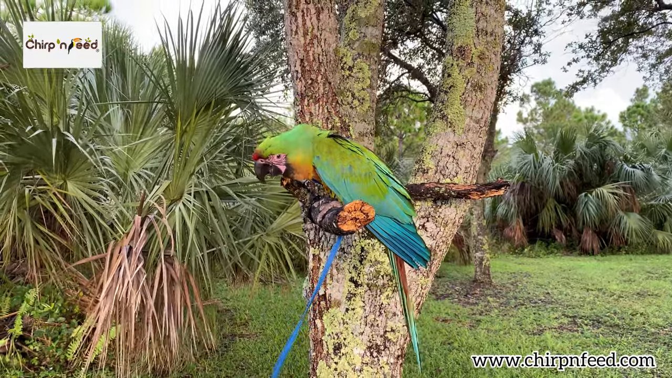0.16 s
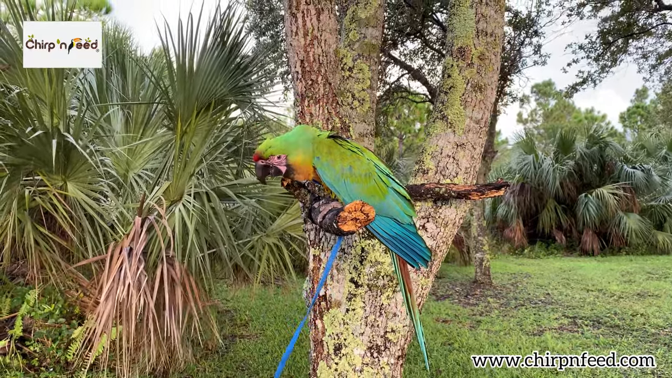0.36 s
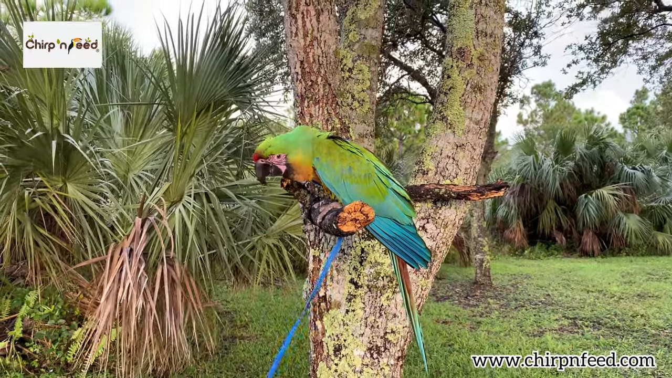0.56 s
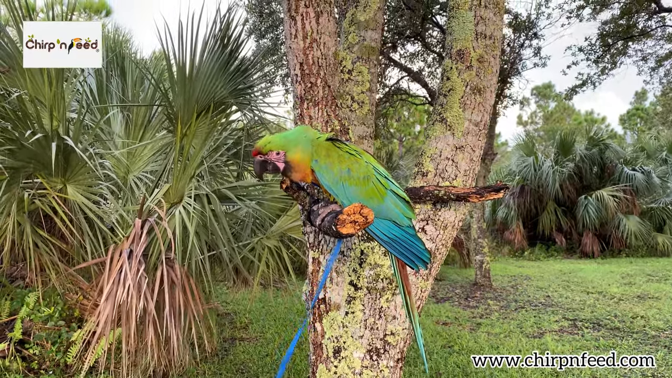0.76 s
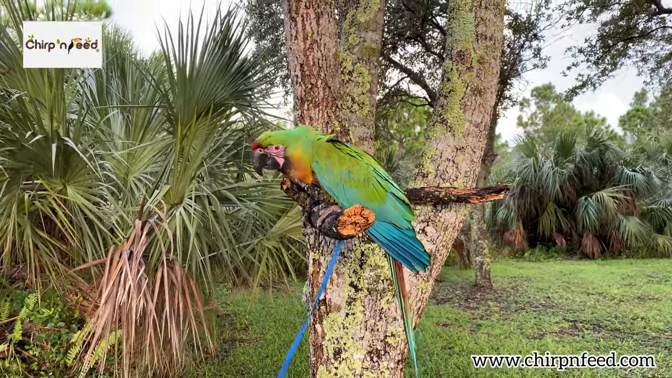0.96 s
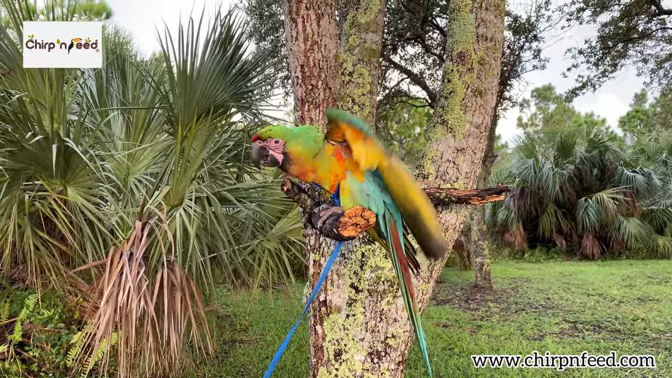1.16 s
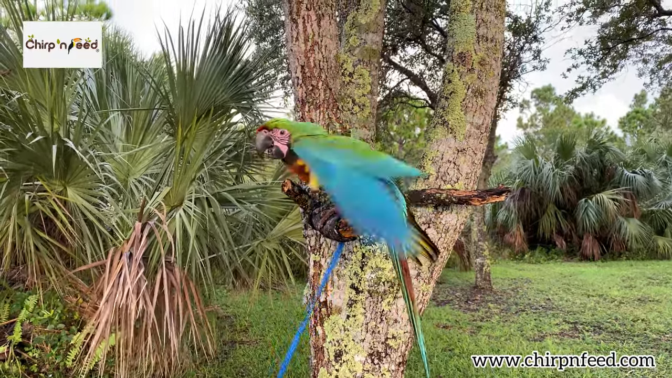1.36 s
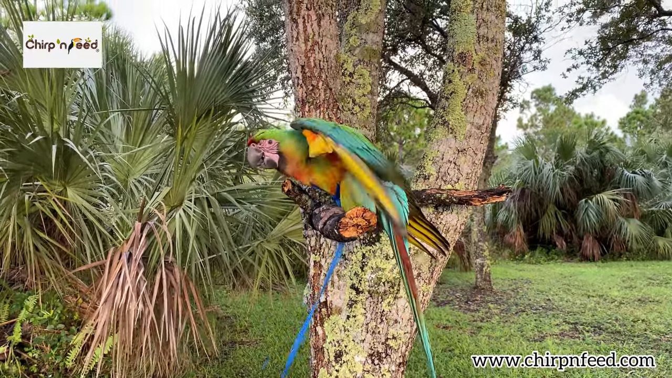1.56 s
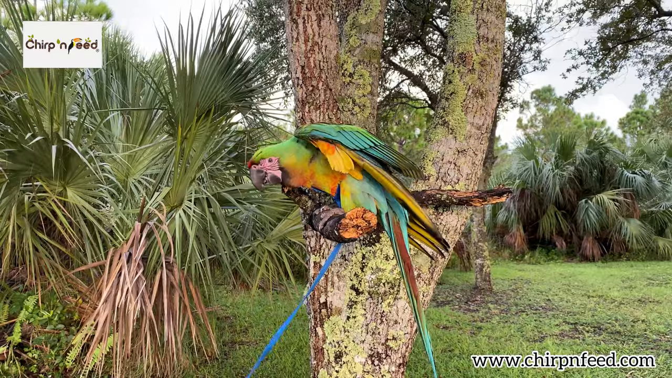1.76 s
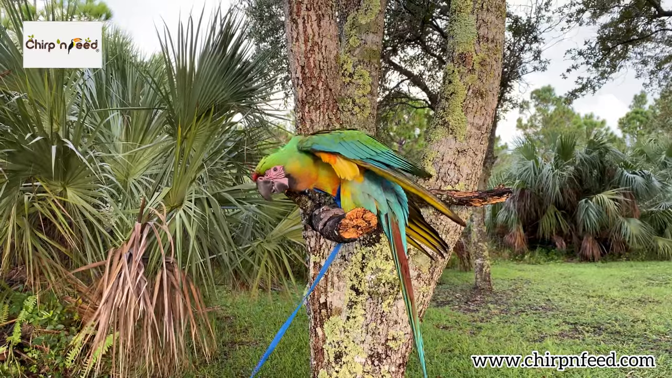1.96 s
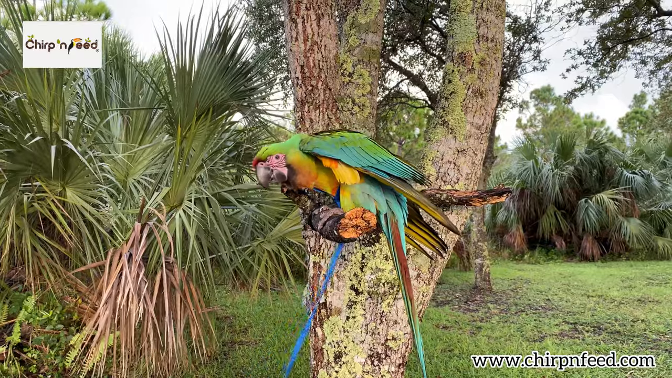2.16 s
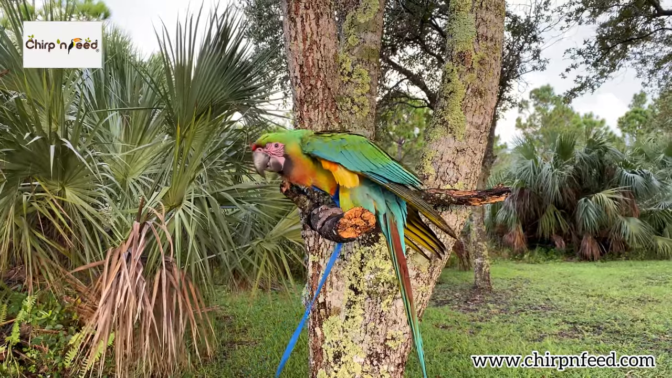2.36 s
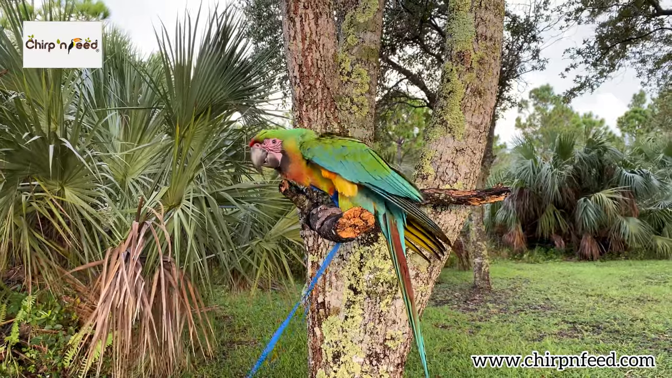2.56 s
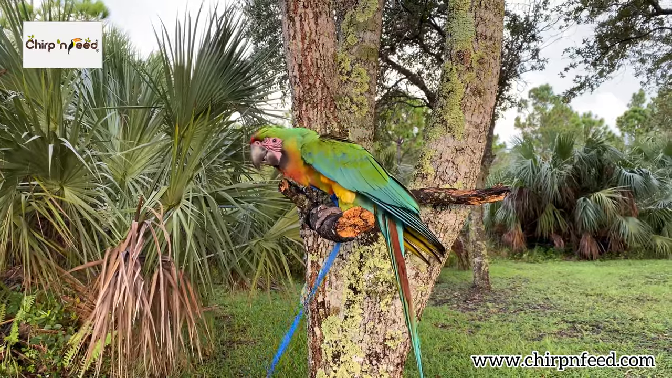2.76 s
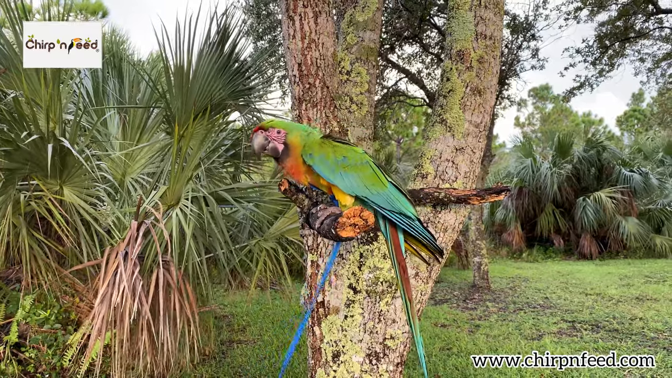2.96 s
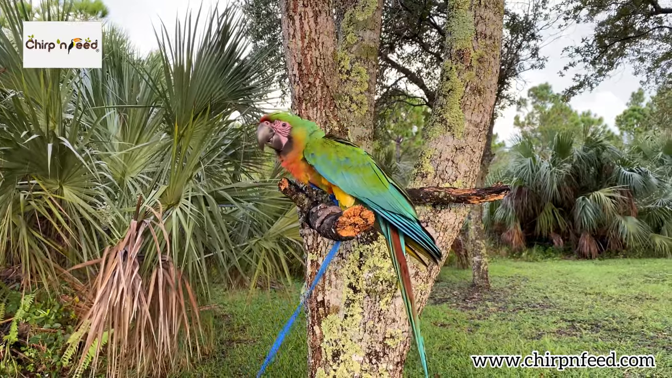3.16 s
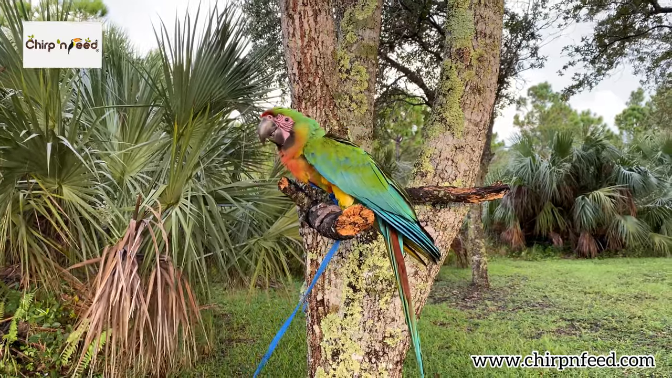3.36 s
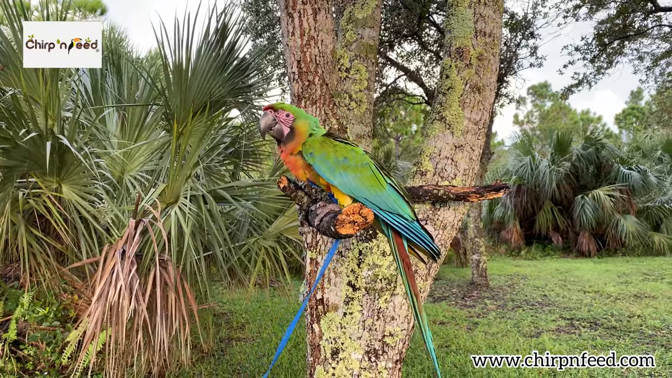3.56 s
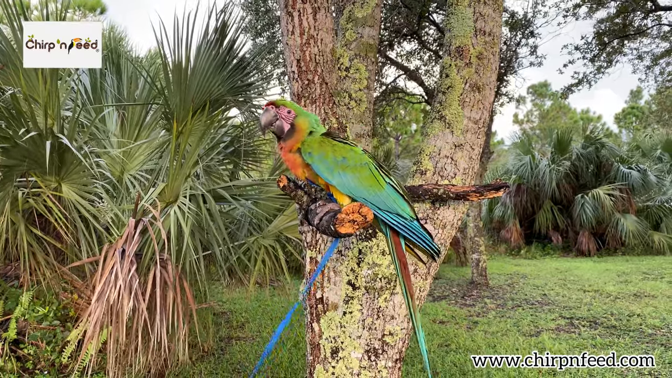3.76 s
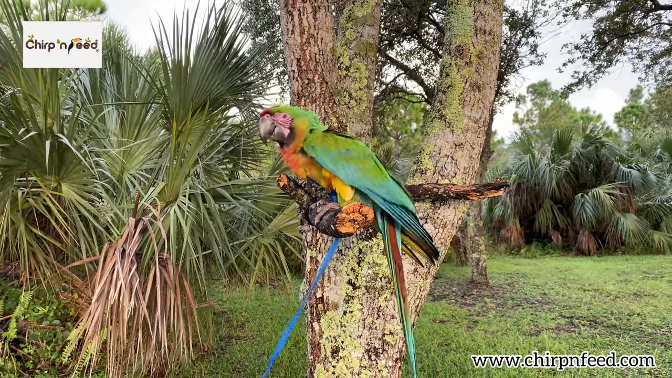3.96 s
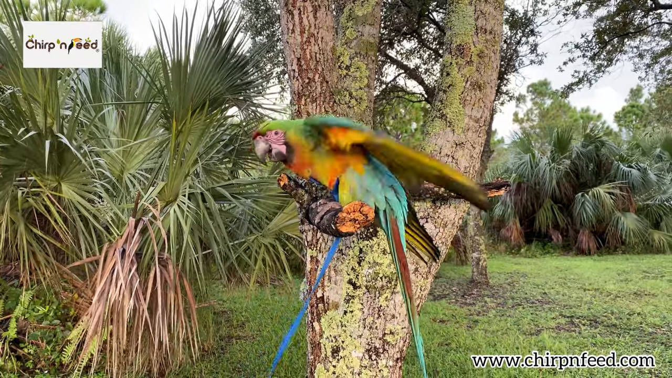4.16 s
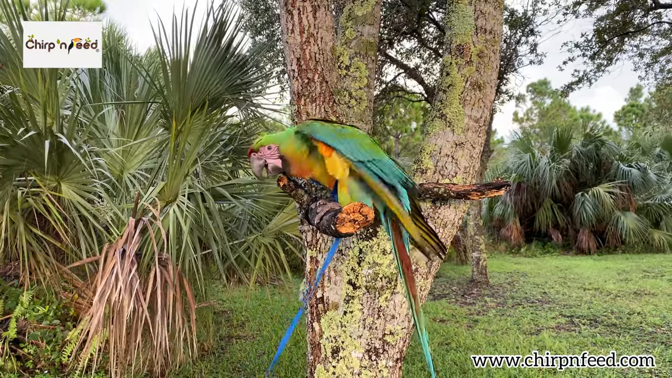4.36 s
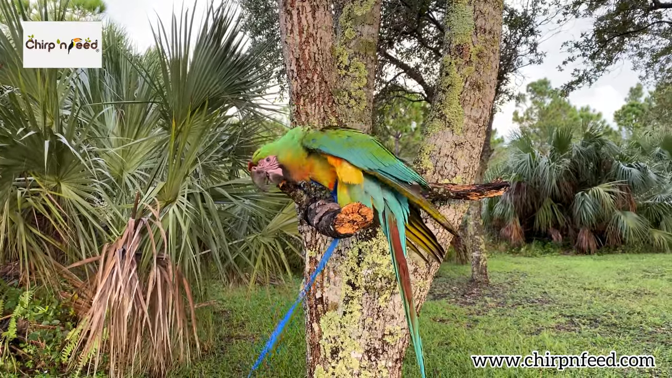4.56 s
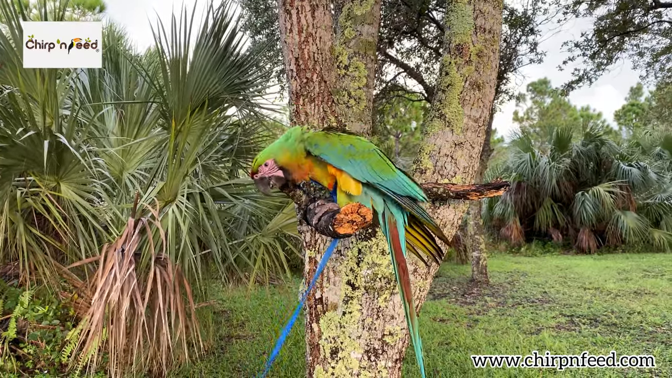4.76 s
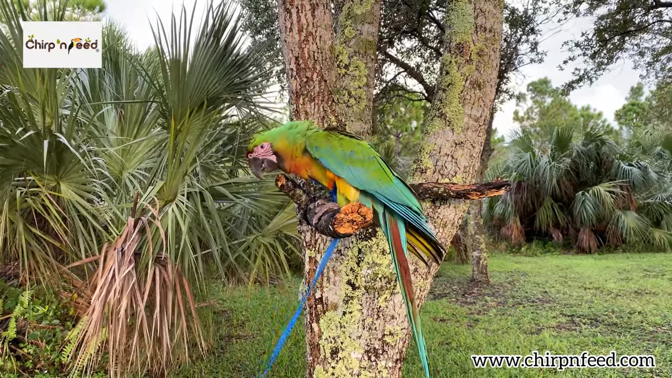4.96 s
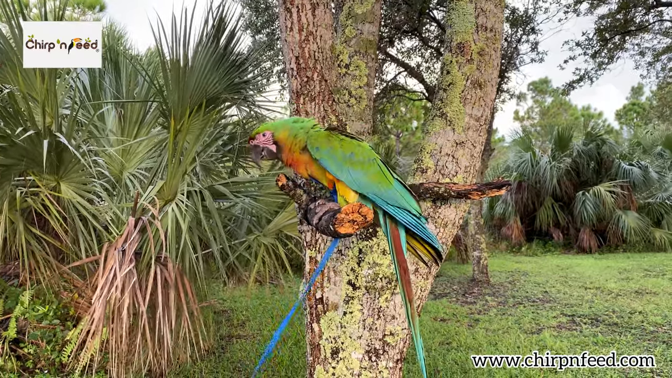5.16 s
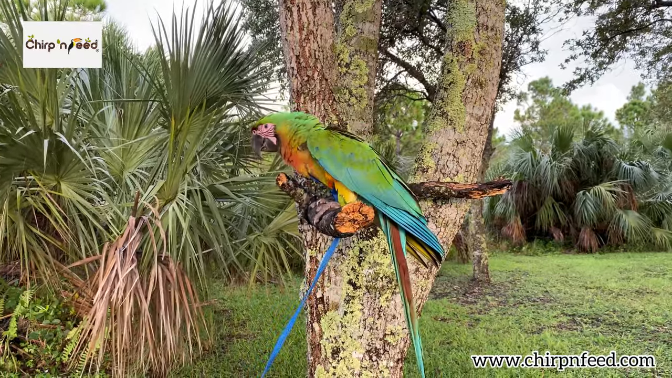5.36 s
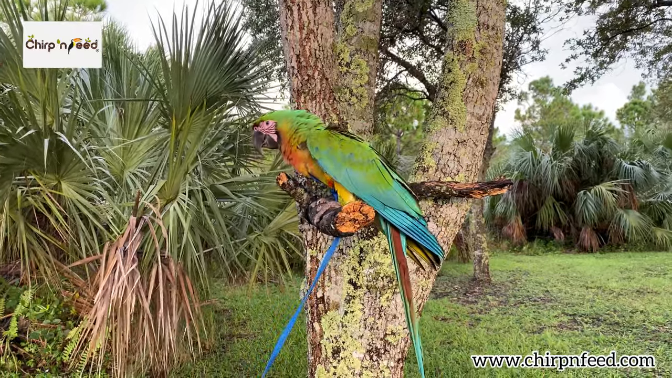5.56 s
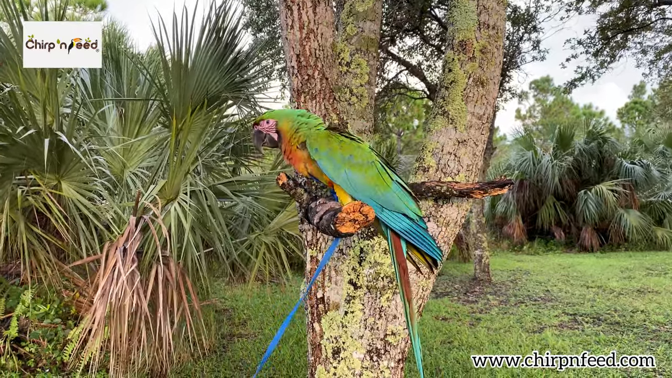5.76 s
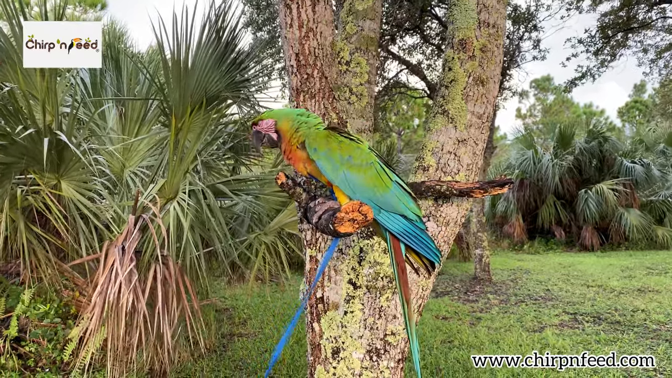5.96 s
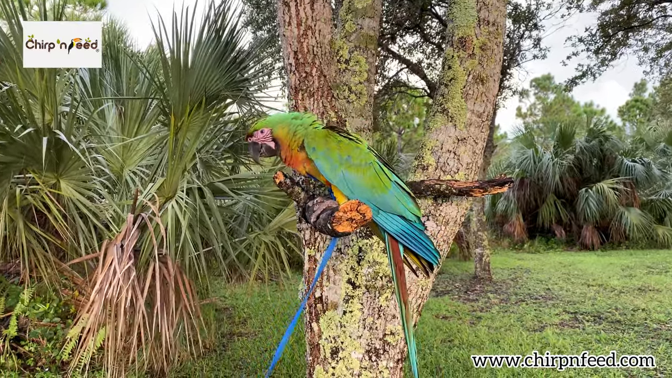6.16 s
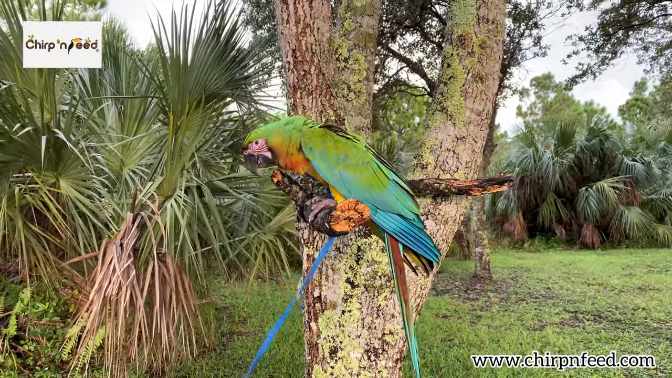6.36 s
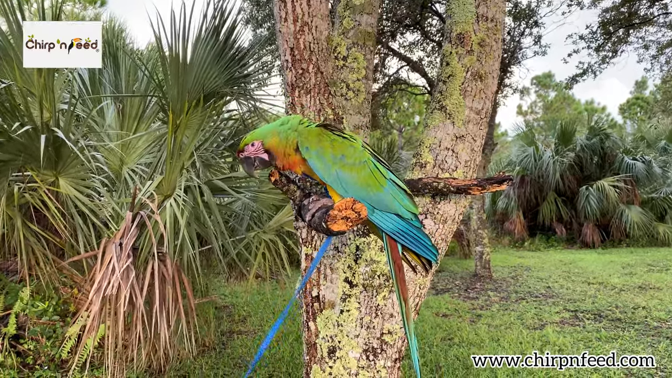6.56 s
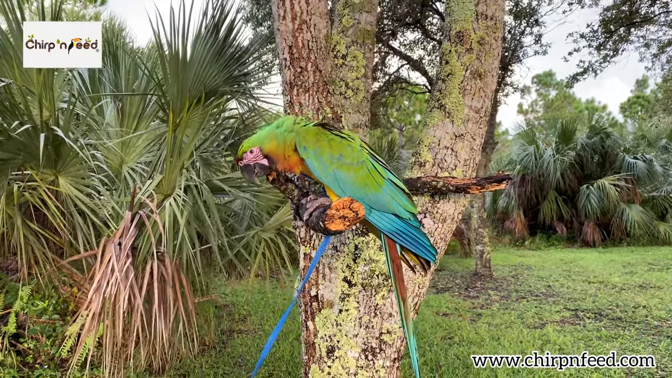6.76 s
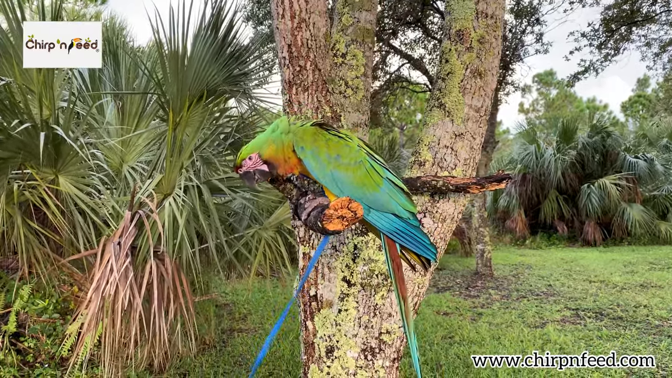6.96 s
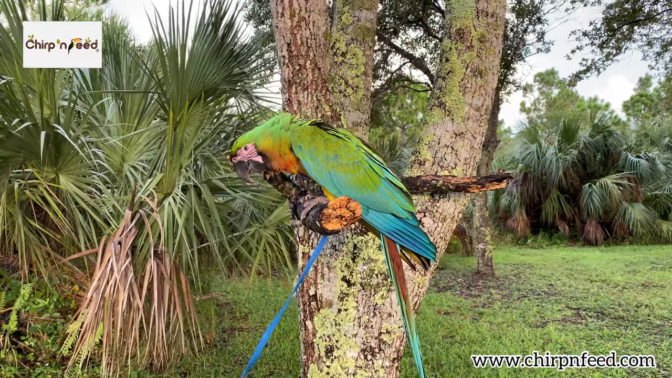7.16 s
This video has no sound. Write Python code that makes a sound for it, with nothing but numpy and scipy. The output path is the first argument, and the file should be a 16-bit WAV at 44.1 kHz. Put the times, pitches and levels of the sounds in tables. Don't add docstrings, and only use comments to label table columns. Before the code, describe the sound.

Outdoors, quiet low rumble and wind thumps; a big parrot squawks roughly near one second and again near four, feathers rustling softly.

```python
import sys
import numpy as np
from scipy import signal
from scipy.fft import rfft, irfft
from scipy.io import wavfile
from scipy.ndimage import uniform_filter1d

SR = 44100
rng = np.random.default_rng(int(sys.argv[2]) if len(sys.argv) > 2 else 0)


def store_pcm(level_fs):
    pcm = np.round(np.clip(level_fs, -1, 1) * 32767).astype(np.int16)
    wavfile.write(sys.argv[1], SR, np.atleast_2d(pcm).T)


def ratio_of_db(decibels):
    return 10 ** (np.asarray(decibels, float) / 20)


N = 317520

# time_s, level_db, throat_hz, brightness_db, roughness (0-1)
SQUAWKS = [
    [(1.194, -42.5, 925, 5, 0.48), (1.215, -36.5, 966, 0.5, 0.43), (1.258, -38.5, 926, 4, 0.37),
     (1.275, -43, 960, -0.5, 1.1), (1.308, -46, 970, 0, 0.9), (1.362, -41, 920, 0.5, 0.8),
     (1.382, -37, 1230, 3.5, 0.31), (1.415, -39.5, 1180, 0, 0.35), (1.447, -51.5, 1147, -6, 0)],
    [(4.1455, -38.5, 1430, -3, 0.2), (4.167, -37, 1405, 2.5, 0.15), (4.195, -36.5, 1240, 2.5, 0.25),
     (4.21, -38.5, 904, -0.5, 0.7), (4.24, -43, 990, -0.5, 0.85), (4.29, -43, 1030, -0.5, 0.8),
     (4.34, -41.5, 940, -1, 0.8), (4.362, -46, 920, 0, 0.5), (4.384, -60, 960, 0, 0.6)],
]
# time_s, peak_db
SLAPS = [(1.1988, -53), (1.2223, -29.5), (1.2318, -48), (1.259, -37), (1.2818, -50), (1.2926, -46),
         (1.3166, -45), (1.3297, -45), (1.3448, -39), (1.3561, -48), (1.3693, -32), (1.3856, -44),
         (1.4056, -42), (1.4126, -43), (4.2129, -32), (4.2336, -35), (4.2522, -43), (4.2628, -48),
         (4.2759, -36), (4.2863, -45), (4.2953, -43), (4.3102, -40), (4.334, -42), (4.3487, -39)]
# centre_hz, width_hz, first_call_db, second_call_db
HEAD = [(780, 200, -5, -5), (2330, 400, -6, -6), (2950, 380, -9, -9), (3560, 280, -6, -9),
        (4030, 340, -12, -8), (4680, 380, -8, -7.5), (5450, 500, -17, -17), (6300, 400, -20, -16),
        (7300, 400, -23, -29), (9000, 700, -30, -30), (10200, 1200, -32, -36), (12000, 1200, -36, -42),
        (14800, 1500, -44, -42)]


def rms_one(x):
    return x / np.sqrt(np.mean(x ** 2) + 1e-20)


def at_hz(points, hz, order=1):
    points = np.array(points)
    return np.interp(np.log(hz), np.log(points[:, 0]), points[:, order])


def bumps(rows):
    t = np.arange(N) / SR
    return sum(ratio_of_db(db) * np.exp(-((t - s) / width) ** 2) for s, width, db in rows)


def drift(rate):
    coarse = 40
    r = np.exp(-2 * np.pi * coarse * rate / SR)
    noise = rng.standard_normal(N // coarse + 2002)
    slow = signal.lfilter([1], [1, -2 * r, r * r], noise)[2000:]
    return np.interp(np.arange(N) / coarse, np.arange(len(slow)), rms_one(slow))


def resonance(x, hz, width_hz):
    hz = np.broadcast_to(hz, len(x))
    r = np.exp(-np.pi * width_hz / SR)
    step = 64 if np.ptp(hz) else len(x)
    zeros = [(1 - r * r) / 2, 0, (r * r - 1) / 2]
    out, state = np.zeros(len(x)), np.zeros(2)
    for i in range(0, len(x), step):
        poles = [1, -2 * r * np.cos(2 * np.pi * hz[i] / SR), r * r]
        out[i:i + step], state = signal.lfilter(zeros, poles, x[i:i + step], zi=state)
    return out


def banded_noise(spectrum, patchy_db, flicker_hz, alike=None):
    # band_hz, likeness (-1 to 1)
    likeness = [(60, 0.46), (110, 0.92), (200, 1), (380, 0.49), (700, -0.066), (1290, -0.73), (2380, 0.29),
                (4400, -0.28), (8120, 0.21), (15000, 0.096)]
    # band_hz, left_minus_right_db
    lean_points = [(60, 0.5), (110, 0.5), (200, 0.5), (380, 2.0), (700, -0.5), (1290, -2.5), (2380, -2.0),
                   (4400, 5.0), (8120, 1.5), (15000, 0.0)]
    lowest, highest = spectrum[0][0], spectrum[-1][0]
    edges = lowest * 2 ** np.arange(0, np.log2(highest / lowest) + 1 / 6, 1 / 3)
    together = drift(flicker_hz / 3)
    white = rng.standard_normal((2, 2, N))
    out = 0
    for k, (low, high) in enumerate(zip(edges, np.minimum(edges[1:], .45 * SR))):
        band = signal.butter(2, [low, high], "band", fs=SR, output="sos")
        mid, side = signal.sosfilt(band, white[k % 2])
        hz = np.sqrt(low * high)
        like = np.clip(at_hz(likeness, hz) if alike is None else alike, -.95, .95)
        gain = ratio_of_db(at_hz(spectrum, hz) + patchy_db * (.8 * together + drift(flicker_hz)))
        lean = ratio_of_db(at_hz(lean_points, hz) / 2 * np.array([[1], [-1]]))
        out = out + gain * lean * (np.sqrt(1 + like) * mid + np.sqrt(1 - like) * side * [[1], [-1]])
    return out / np.sqrt(np.mean(out.mean(axis=0) ** 2))


def wood_tail(x):
    t60_s = 0.27
    t = np.arange(SR // 2) / SR
    response = rng.standard_normal((2, len(t))) * ratio_of_db(-26.0 - 60 * t / t60_s)
    return signal.fftconvolve(x[None], response, axes=1)[:, :N]


def road():
    # band_hz, density_db (per Hz)
    drone = [(59, -34), (100, -12.5), (155, -6), (350, -6.5), (433, -7.5), (590, -14), (640, -17.5),
             (700, -29), (910, -45), (1540, -120)]
    # band_hz, density_db (per Hz)
    roar = [(330, -40.5), (560, -1), (590, -40.5), (639, -8.5), (896, -0.5), (1000, -3.5), (1360, -11),
            (1600, -16.5), (2080, -63.5), (3520, -120)]
    t = np.arange(N) / SR
    engines = ratio_of_db(-56.5) * banded_noise(drone, patchy_db=1.5, flicker_hz=13)
    tyres = ratio_of_db(-61.5 - 0.12 * t) * banded_noise(roar, patchy_db=1.2, flicker_hz=20.3)
    return engines + tyres


def machine():
    # band_hz, density_db (per Hz)
    whine = [(760, -41), (1300, -5), (1670, -2), (1980, 7), (2240, -8), (2400, -4), (2580, -7.5),
             (2860, -28), (3200, -12), (4160, -56), (7040, -120)]
    # time_s, width_s, level_db
    swells = [
        (0.1, 0.56, -83),
        (4.6, 0.52, -76.5),
        (5.96, 0.56, -69.5),
        (7.2, 0.55, -69),
    ]
    idle_db, on_db, start_s, rise_s = -74.5, -73, 4.2, 0.17
    running = np.clip((np.arange(N) / SR - start_s) / rise_s, 0, 1)
    gain = ratio_of_db(idle_db + (on_db - idle_db) * running) + bumps(swells)
    return gain * banded_noise(whine, patchy_db=1.04, flicker_hz=13)


def leaves():
    # band_hz, density_db (per Hz)
    rustle = [(1590, -36.5), (2700, -3), (3860, -5), (4590, -6), (5720, -14), (7140, -11.5), (9250, -35),
              (11200, -7.5), (12000, -27), (12700, -24), (16500, -46), (22000, -120)]
    start_db, steady_db, settle_s = -75.5, -81, 1
    lull_s, lull_width_s, lull_db = 3.53, 0.9, -3
    t = np.arange(N) / SR
    rustle_db = steady_db + (start_db - steady_db) * np.exp(-t / settle_s)
    rustle_db = rustle_db + lull_db * np.exp(-((t - lull_s) / lull_width_s) ** 2)
    out = ratio_of_db(rustle_db) * banded_noise(rustle, patchy_db=-0.5, flicker_hz=6.1)
    return signal.sosfilt(signal.butter(8, 12600, fs=SR, output="sos"), out)


def wind():
    # time_s, level_db
    breeze = [(0, -50.5), (.66, -56), (1.1, -54.5), (1.4, -52.5), (1.85, -52.5), (2.9, -49.5),
              (3.12, -52.5), (3.3, -42), (3.72, -45), (3.77, -55.5), (4.85, -51), (5.0, -61.5),
              (5.5, -52.5), (5.75, -54), (6.3, -44), (6.75, -51), (7.2, -47)]
    # time_s, level_db
    gusts = [(0.819, -40), (0.898, -47.5), (0.77, -42.5), (1.35, -44), (1.5, -62), (1.561, -58),
             (2.166, -47.5), (2.951, -47), (4.889, -43.5), (6.26, -59), (6.34, -67), (6.609, -50),
             (6.992, -49.5)]
    # band_hz, density_db (per Hz)
    buffet = [(12, -40.5), (20, -9), (51, 1.5), (75, -1.5), (145, -6.5), (211, -14.5), (372, -28),
              (431, -24.5), (500, -27.5), (650, -61), (1100, -120)]
    gust_width_s = 0.012
    breeze_s, breeze_db = np.transpose(breeze)
    air = ratio_of_db(np.interp(np.arange(N) / SR, breeze_s, breeze_db))
    air = air + bumps([(s, gust_width_s, db) for s, db in gusts])
    return air * banded_noise(buffet, patchy_db=.7, flicker_hz=14, alike=.35)


def thumps():
    # time_s, peak_db, push_hz
    pushes = [(0.763, -37, 178), (.78, -48, 110), (0.824, -35, 143), (0.893, -37, 151), (1.012, -39.5, 186),
              (1.505, -37.5, 80), (1.568, -41.5, 99), (5.8, -42, 149), (2.959, -49, 110),
              (3.28, -36.5, 102), (3.334, -31.5, 110), (3.462, -36, 90), (3.492, -34, 81),
              (3.543, -32, 130), (3.681, -34.5, 90), (3.714, -36, 85), (4.251, -37, 120),
              (6.262, -38.5, 90), (6.336, -37, 85), (6.554, -41, 90), (6.604, -35, 85), (6.657, -38.5, 80),
              (6.877, -38.5, 90), (6.995, -33, 74)]
    t, out = np.arange(N) / SR, 0
    for (s, db, hz), lean_db in zip(pushes, rng.normal(0, 1.4, len(pushes))):
        u = np.clip((t - s) * hz * 4, -9, 9)
        out = out - ratio_of_db(db + 4 + lean_db * np.array([[1], [-1]])) * u * np.exp(-u ** 2 / 2)
    return out


def trills():
    # start_s, length_s, singer (row of singers; 4 the machine, 5 the road), level_db
    calls = [(0, .97, 3, -87.5), (.79, .11, 3, -83), (0, .14, 3, -86), (.53, .25, 2, -86),
             (.327, .1, 2, -77.5), (1.99, .3, 2, -86), (2.663, .13, 0, -80.5), (3.66, .11, 0, -84),
             (4.64, .089, 0, -85), (5.479, .18, 0, -83.5), (5.797, .32, 2, -84), (6.136, .14, 0, -86),
             (6.522, .16, 1, -82), (6.7, .2, 0, -84.5), (4.35, 2.83, 4, -72.5), (1.897, 1.1, 5, -61.5),
             (5.18, .17, 6, -79)]
    # centre_hz, width_hz,
    # throbs_per_s
    singers = [(7250, 830, 29), (4800, 710, 24), (4560, 690, 22), (7150, 230, 98), (2243, 160, 14),
               (1056, 190, 11), (2870, 210, 7.5)]
    out = np.zeros((2, N))
    for s, length, singer, db in calls:
        hz, width_hz, throbs = singers[singer]
        t = np.arange(int(length * SR)) / SR
        throb = (.3 + np.exp(-3.0 * (t * throbs % 1))) * np.sin(np.pi * t / length) ** .4
        noise = rng.standard_normal((2, len(t))) * throb
        buzz = [resonance(resonance(w, hz, width_hz), hz, width_hz) for w in noise]
        out[:, round(s * SR):][:, :len(t)] += ratio_of_db(db) * rms_one(np.array(buzz))
    return out


def birds():
    # start_s, length_s, from_hz, to_hz, level_db
    early = [(0.16, .04, 4330, 4300, -80), (1.035, 0.023, 4200, 3900, -80), (1.992, 0.043, 5000, 4500, -80),
             (2.54, .016, 4200, 4500, -72), (2.545, .027, 5160, 5000, -78), (2.561, 0.038, 4600, 3470, -70),
             (2.601, .04, 3650, 3450, -78), (2.8, .035, 4550, 4420, -82), (2.809, .04, 5030, 4900, -86),
             (3.33, 0.014, 2840, 3100, -74), (3.345, .03, 3050, 2950, -82), (3.906, 0.028, 4700, 4500, -80),
             (3.94, .07, 3770, 3790, -86), (4.594, 0.028, 4600, 3970, -79), (4.684, .105, 3810, 3700, -78),
             (4.79, .05, 3750, 3800, -85), (5.362, 0.02, 5140, 4380, -70),
             (5.378, 0.064, 4380, 4210, -72.5), (5.774, .017, 4420, 3920, -76),
             (5.948, 0.047, 2250, 1930, -67), (6.29, .05, 2760, 2740, -79), (6.448, 0.12, 3750, 3710, -82),
             (6.45, .014, 3250, 3000, -74), (6.47, 0.016, 3250, 2890, -67)]
    # start_s, length_s, from_hz, to_hz, level_db
    slurs = [
        (0.797, 0.038, 3940, 2930, -78),
        (0.885, 0.062, 4130, 3000, -80),
        (2.735, 0.084, 3130, 5000, -76),
    ]
    # start_s, top_hz, then level_db of each note
    wren = [
        (3.376, 5430, -89, -79, -77, -96),
        (6.52, 5340, -76.5, -72, -73, -86),
    ]
    period_s, note_s, arch_hz, peak_at = .0445, .026, 420, .45
    notes = [(row, lambda u: 1 - (1 - u) ** 1.65) for row in early]
    notes += [(row, lambda u: u ** 1.6) for row in slurs]
    for s, top, *levels_db in wren:
        for k, db in enumerate(levels_db):
            row = (s + k * period_s, note_s, top, top - arch_hz, db - 2)
            notes.append((row, lambda u: (u / peak_at - 1) ** 2))
    out = np.zeros(N)
    flutter = rms_one(uniform_filter1d(rng.standard_normal(SR // 4), size=90))
    for k, ((s, length, hz0, hz1, db), shape) in enumerate(notes):
        u = np.linspace(0, 1, int(length * SR))
        phase = 2 * np.pi * np.cumsum(hz0 + (hz1 - hz0) * shape(u)) / SR
        gain = ratio_of_db(db + 3 + 1.5 * np.roll(flutter, 400 * k)[:len(u)])
        out[round(s * SR):][:len(u)] += gain * np.sin(np.pi * u) ** .6 * np.sin(phase)
    sides = np.array([ratio_of_db(7.0) * out, -ratio_of_db(-5.0) * np.roll(out, 3)])
    return sides + wood_tail(out)


def ticks():
    # time_s, peak_db, ring_hz
    taps = [(.023, -62, 4030), (0.16, -50, 2110), (0.162, -51, 2720), (.162, -52, 4230),
            (2.504, -68, 11100), (5.626, -74, 11600), (4.108, -64, 4300), (4.108, -66, 7050),
            (4.6, -73, 4700), (.9194, -74, 8700), (1.4664, -54, 9100), (1.486, -48, 6640),
            (1.5644, -54, 12100), (1.571, -66, 5740), (1.6044, -64, 6200), (1.6194, -72, 6000),
            (1.7194, -77, 7900), (2.504, -67, 7400), (2.505, -82, 4470), (2.909, -67, 11600),
            (3.6994, -75, 4380), (5.3514, -61, 4500), (5.36, -61, 3460), (6.1114, -66, 11500),
            (6.4656, -62, 3900), (6.8674, -72, 8750), (1.4945, -56, 5900), (1.4955, -46, 10500),
            (1.498, -54, 14500), (1.487, -48, 10400), (1.474, -64, 6500), (1.614, -68, 7550),
            (2.505, -71, 3600)]
    out, t = np.zeros((2, N + 900)), np.arange(900) / SR
    for s, db, hz in taps:
        width_hz, fade = hz ** 2 / 22000, 14 / hz
        noise = rng.standard_normal((2, 900)) * t * np.exp(-2 * t / fade)
        rings = [resonance(resonance(w, hz, width_hz), hz, width_hz) for w in noise]
        out[:, round((s - fade / 2) * SR):][:, :900] += ratio_of_db(db - 11.5) * rms_one(np.array(rings))
    out = out[:, :N]
    return out + ratio_of_db(-7.5) * wood_tail(out[0])


def feathers():
    # start_s, length_s, level_db
    rubs = [(0, .12, -93), (0.488, .09, -76), (0.576, 0.087, -80), (1.083, .03, -80), (1.146, 0.048, -63),
            (1.19, 0.24, -62.5), (1.41, .06, -70), (1.452, 0.091, -63), (1.464, 0.031, -65),
            (1.56, 0.074, -71), (1.628, .04, -89), (1.698, 0.089, -79), (4.075, 0.089, -69),
            (4.096, 0.038, -73), (4.144, 0.27, -72)]
    # band_hz, density_db (per Hz)
    plumage = [(1470, -26), (2500, 3), (3110, -1), (4110, -3), (6550, 0.5), (9080, -31), (11600, 26.5),
               (13400, 5), (14800, -7), (16000, -12)]
    t = np.arange(N) / SR
    swell = 0
    for s, length, db in rubs:
        swell = swell + ratio_of_db(db) * np.sin(np.pi * np.clip((t - s) / length, 0, 1)) ** 0.41
    return swell * banded_noise(plumage, patchy_db=2.0, flicker_hz=80, alike=-.1)


def hollowed(x, call):
    # centre_hz, width_hz, first_call_depth (0-1), second_call_depth (0-1)
    hollows = [(3340, 130, 0.045, 0.95), (4380, 130, 0.12, 0.31), (6540, 270, 1, 0.32)]
    for hz, width_hz, *depths in hollows:
        x = x - np.clip(depths[call], 0, 1) * resonance(x, hz, width_hz)
    return x


def slaps():
    cracks, fade = np.full(N, 1e-18), np.exp(-np.arange(200) / 32)
    for s, db in SLAPS:
        cracks[round((s + .001) * SR):][:200] = ratio_of_db(db + 19.5) * rng.standard_normal(200) * fade
    calls = []
    for call in range(2):
        rung = sum(ratio_of_db(1.25 * row[2 + call]) * resonance(cracks, row[0], 2 * row[1]) for row in HEAD[3:])
        calls.append(hollowed(rung, call))
    return np.where(np.arange(N) < SQUAWKS[1][0][0] * SR, calls[0], calls[1])


def flap_phase(start, size, wander):
    s = np.array(SLAPS)[:, 0]
    s = np.r_[0, s, s[-1] + 1]
    cycles = np.r_[0, np.cumsum(np.maximum(1, np.round(np.diff(s) * 190)))]
    even = np.interp((start + np.arange(size)) / SR, s, cycles)
    return np.maximum.accumulate(even + .13 * wander)


def gesture(rows, register):
    held_hz, switch_s = 324, .006
    attack_s, release_s = 0.0047, 0.0086
    throb_db, throb_bright_db, throb_width_s = 6, 3.5, .005
    catch_s, catch_width_s, catch_db = 1.308, .004, -7
    start, size = int(rows[0][0] * SR), int((rows[-1][0] - rows[0][0]) * SR)
    t = (start + np.arange(size)) / SR
    times, *columns = np.array(rows).T
    db, throat, bright_db, rough = [np.interp(t, times, c) for c in columns]
    open_hz, open_s, close_hz, close_s = register
    held = np.clip((t - t[0] - open_s) / switch_s + .5, 0, 1)
    slack = np.clip((t - t[-1] + close_s) / switch_s + .5, 0, 1)
    rate = open_hz + (held_hz - open_hz) * held + (close_hz - held_hz) * slack
    flap = np.clip(rough, 0, 1) * held
    jitter = .003 + .03 * flap
    weak_db = np.minimum(1.5 + 11 * flap, 8) * held * (1 - .5 * slack)
    edges = np.clip(np.minimum((t - t[0]) / attack_s, (t[-1] - t) / release_s), 0, 1)
    throb = flap * (sum(np.exp(-((t - s) / throb_width_s) ** 2) for s, _ in SLAPS) - .5)
    bright_db = bright_db + throb_bright_db * throb
    caught_db = catch_db * np.exp(-((t - catch_s) / catch_width_s) ** 2)
    gain = edges * ratio_of_db(db + throb_db * throb + caught_db)
    return start, size, gain, throat, bright_db, rate, jitter, weak_db, flap


def membrane(start, size, rate, jitter, weak_db, flap):
    wobble = rms_one(uniform_filter1d(rng.standard_normal((2, size)), size=120))
    cycle = np.floor(np.cumsum(rate * (1 + jitter * wobble[0])) / SR + .97)
    flap_cycle = flap_phase(start, size, wobble[1])
    choke = 1 - flap * (1 - np.exp(-5 * (flap_cycle % 1)))
    beats_db = -weak_db * (cycle % 2) + 40 * jitter * rng.standard_normal(size)
    beats = np.diff(cycle, prepend=0) * ratio_of_db(beats_db)
    flap_count = np.floor(flap_cycle)
    flaps = np.diff(flap_count, prepend=flap_count[0]) * flap * ratio_of_db(3 * rng.standard_normal(size))
    air = ratio_of_db(-42 + 10 * flap) * rng.standard_normal(size) * choke
    pulses = beats * choke * (1 - .7 * flap)
    return signal.lfilter([1], [1, -.6], pulses + flaps + air)


def squawk(rows, register, call):
    start, size, gain, throat, bright_db, rate, jitter, weak_db, flap = gesture(rows, register)
    source = membrane(start, size, rate, jitter, weak_db, flap)
    beak, beak_db = 1.865 * throat, -1.5 + 1.9 * bright_db
    low = resonance(source, throat, 208) - ratio_of_db(beak_db) * resonance(source, beak, 175)
    low = low + ratio_of_db(-7.0) * resonance(source, 1350, 210)
    low = signal.sosfilt(signal.butter(2, [480, 2800], "band", fs=SR, output="sos"), low)
    high = 0
    for k, (hz, width_hz, *levels_db) in enumerate(HEAD):
        ring = resonance(resonance(source, hz, width_hz), hz, 2 * width_hz)
        high = high + ratio_of_db(levels_db[call]) * (-1) ** (k + 1) * ring
    high = signal.sosfilt(signal.butter(2, 7800, fs=SR, output="sos"), high)
    chest = resonance(resonance(source, 323, 93), 323, 2 * 93)
    voice = hollowed(low + ratio_of_db(bright_db) * high, call)
    voice = voice + ratio_of_db(-9) * (1 - flap) ** 2 * chest + ratio_of_db(-19.5) * resonance(source, 525, 240)
    voice = voice / np.sqrt(uniform_filter1d(voice ** 2, size=900) + 1e-12)
    voice = 2.6 * np.tanh(voice / 2.6)
    return np.pad(gain * voice, (start, N - start - size))


def ports(x):
    # band_hz, left_lead_rad, left_minus_right_db
    pair = [(100, .05, 1.2), (700, .35, -.5), (1300, .75, -3), (2300, 1.7, -4.5), (3270, 2.35, -1.5),
            (3700, 2.1, 2), (4740, 2.0, 3.5), (6600, 2.3, 1), (8100, 2.3, -2.5), (10700, .6, -1),
            (15000, 2.0, -.5)]
    hz = np.fft.rfftfreq(N, 1 / SR) + 1
    half = ratio_of_db(at_hz(pair, hz, order=2) / 2) * np.exp(.5j * at_hz(pair, hz))
    return irfft(rfft(x) * [half, 1 / half], N)


def garden(x):
    # delay_s, level_db
    echoes = [(.0041, -23), (.0093, -24), (.017, -24), (.029, -28), (.046, -32), (.071, -36)]
    t = np.arange(4400) / SR
    smear = 0
    for lag, db in echoes:
        decay = np.exp(-np.abs(t - lag) / (0.39 * lag))
        smear = smear + ratio_of_db(db) * (t > lag) * decay / np.sqrt(lag * SR / 8)
    response = signal.lfilter([.6], [1, -.4], rng.standard_normal((2, len(t))) * smear)
    return signal.fftconvolve(x[None], response, axes=1)[:, :N]


def parrot():
    # opening_hz, opening_s, closing_hz, closing_s
    registers = [
        (200, .021, 275, .028),
        (291, .025, 322, .02),
    ]
    voice = sum(squawk(*call) for call in zip(SQUAWKS, registers, range(2)))
    dry_voice = ratio_of_db(8.5) * voice + slaps()
    return ports(dry_voice) + garden(dry_voice)


def scene():
    background = road() + machine() + leaves() + wind() + thumps()
    garden_life = trills() + birds() + ticks()
    return background + garden_life + feathers() + parrot()


def roll_off(x):
    return signal.sosfilt(signal.butter(12, 16570, fs=SR, output="sos"), x)


def record(dry):
    # band_hz, gain_db
    microphone = [(20, -14), (45, -5.5), (70, 4), (8300, -1.5), (9200, -6), (10200, -6.5), (12300, -10),
                  (12800, -17), (13500, -21.5), (14200, -9.5), (15700, -6), (15950, -37)]
    colour = ratio_of_db(at_hz(microphone, np.fft.rfftfreq(N, 1 / SR) + 1))
    return roll_off(irfft(rfft(dry) * colour, N))


dry = scene()
out = record(dry)
store_pcm(out)
```